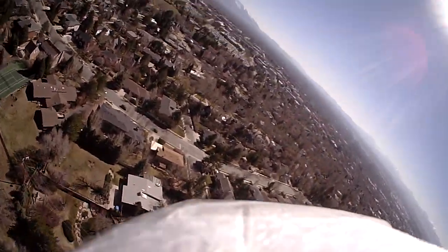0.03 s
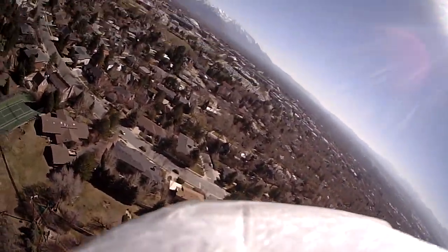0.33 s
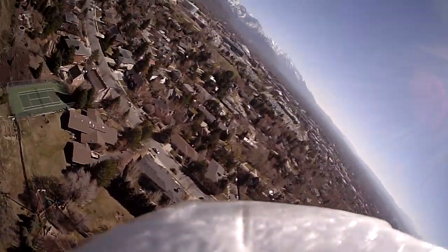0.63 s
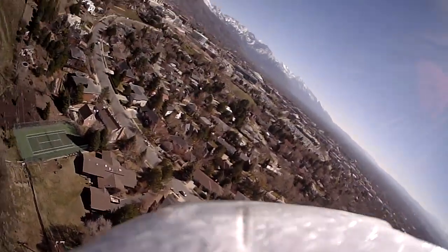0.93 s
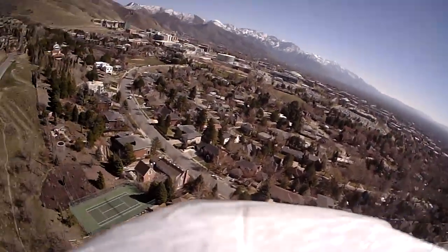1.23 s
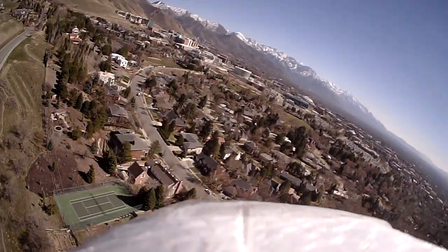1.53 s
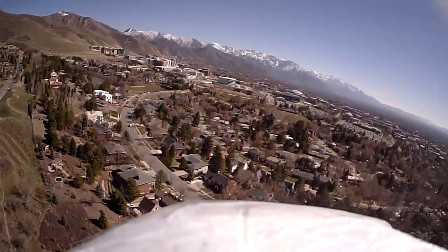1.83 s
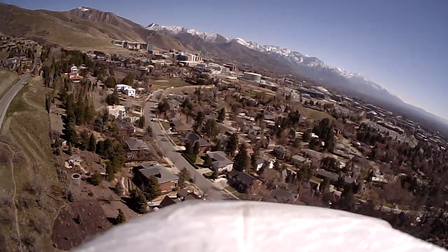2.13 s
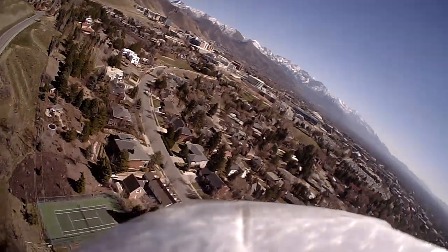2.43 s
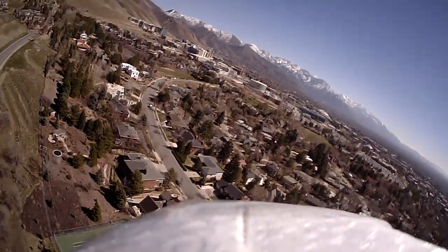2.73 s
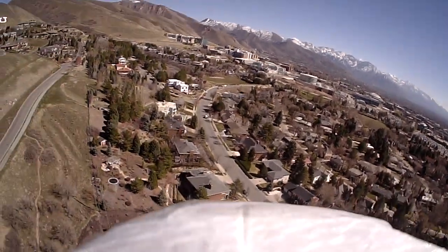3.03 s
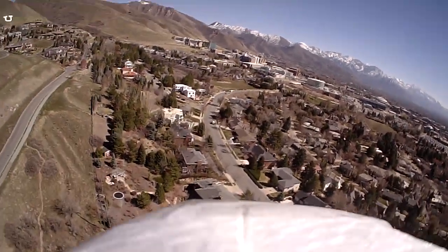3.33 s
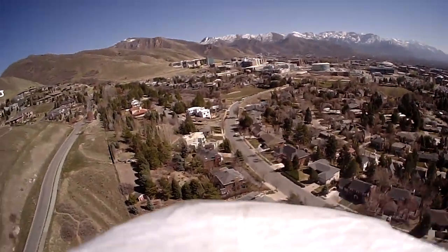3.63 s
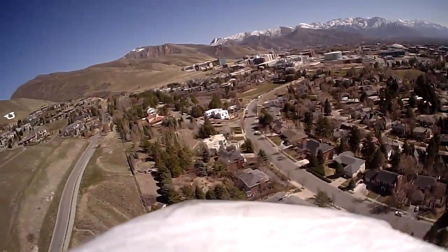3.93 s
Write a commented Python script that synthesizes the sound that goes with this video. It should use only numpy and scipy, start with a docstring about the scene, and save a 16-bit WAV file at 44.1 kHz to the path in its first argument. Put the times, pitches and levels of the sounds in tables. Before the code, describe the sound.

Strong wind buffets a microphone on a flying model aircraft, rumbling and thumping under a rushing hiss. The gusts swell early, ease briefly past the middle as faint dry ticks gather, then return.

```python
"""Air rushes over the camera microphone of a model aircraft as it banks and levels out.
It opens on lopsided buffeting, roar and fizz, with a breathy edge whistle and the housing's hollows.
At 0.5 s large eddies swell against the microphone port; by 2 s the whistle has faded. Near 2.6 s the
wind lulls, a band of hiss rises and the airframe's tiny dry ticks crowd together. From 2.8 s eddies
and hard buffets return while the hiss thins out."""
import sys
import numpy as np
from scipy import signal
from scipy.fft import rfft, irfft
from scipy.io import wavfile

SR = 44100
rng = np.random.default_rng(int(sys.argv[2]) if len(sys.argv) > 2 else 0)


def inscribe(sig):
    """Save sig as 16-bit PCM at rate SR to the path in sys.argv[1].

    A 1-D sig is mono; a 2-D sig holds one channel per row.
    Samples are clipped to [-1, 1] before scaling.
    """
    pcm = np.round(np.clip(np.atleast_2d(sig).T, -1, 1) * 32767)
    wavfile.write(sys.argv[1], SR, pcm.astype(np.int16))


N = 176400
T = np.arange(N) / SR
HZ = np.fft.rfftfreq(N, 1 / SR)


def amp(db):
    """dB to gain."""
    return 10 ** (np.asarray(db) / 20)


def unit(x):
    """Scale to rms 1."""
    return x / np.sqrt(np.mean(x ** 2) + 1e-20)


def curve(rows, column=1):
    """Time-table column, interpolated per sample."""
    rows = np.array(rows, float)
    return np.interp(T, rows[:, 0], rows[:, column])


def add(mix, start_s, sound):
    """Mix a sound in at start_s."""
    part = mix[max(round(start_s * SR), 0):][:len(sound)]
    part += sound[:len(part)]


def noise(spectrum):
    """Noise shaped by a spectrum table, rms 1."""
    hz, db = np.transpose(spectrum)
    gain = amp(np.interp(np.log(HZ + 1), np.log(hz), db))
    return unit(irfft(rfft(rng.standard_normal(N)) * gain, N))


def wander(rate_hz):
    """Smooth random motion up to rate_hz, rms 1."""
    re, im = rng.standard_normal((2, len(HZ)))
    gain = HZ / (HZ + 4) / np.sqrt(1 + (HZ / rate_hz) ** 4)
    return unit(irfft((re + 1j * im) * gain, N))


def blown(hz, width_hz):
    """Turbulence-driven resonance: a noise band around a pitch or pitch curve."""
    phase = 2 * np.pi * np.cumsum(hz * np.ones(N)) / SR
    return unit(wander(width_hz / 2) * np.cos(phase) + wander(width_hz / 2) * np.sin(phase))


# Large-eddy envelope: t/s, level/dB
EDDY_ENVELOPE = [(0,-31),(.15,-27),(.21,-32.5),(.37,-29.5),(.48,-20.5),(.85,-20),(.96,-22.5),(1.2,-20.5),(1.38,-20.5),(1.48,-24),(1.62,-18.5),(1.76,-29.5),(1.9,-24),(2.01,-28.5),(2.12,-24),(2.425,-23),(2.46,-29.5),(2.62,-35),(2.76,-31.5),(2.815,-24),(2.86,-31),(2.95,-27),(3.08,-28),(3.14,-37),(3.24,-25),(3.37,-22),(3.62,-23),(3.78,-26.5),(3.87,-23.5),(4,-34.5)]
# Rumble between eddies: f/Hz, level/dB
RUMBLE_SPECTRUM = [(15,-1),(30,-8),(60,0),(100,0),(150,7.5),(200,7),(280,0),(450,-8),(1000,-54)]
def eddies(rate_hz=150, mid_width_s=0.000913, mid_boom_hz=195.6, spread_db=3):
    """Unevenly shed eddies, each a push between two shallow pulls, over boom and rumble."""
    stretch = np.exp(0.075 * (T - T.mean()))  # bumps and boom slowly deepen
    gaps, sizes, lengths = rng.standard_normal((1100, 3)).T
    starts_s = np.cumsum(np.exp(0.5 * gaps)) / rate_hz
    bumps = np.zeros(N)
    for start_s, size, length in zip(starts_s[starts_s < T[-1]], sizes, lengths):
        width_s = mid_width_s * np.exp(0.18 * length) * stretch[int(start_s * SR)]
        u = np.arange(-6, 6, 1 / (width_s * SR))
        bump = (1 - u ** 2) * np.exp(-u ** 2 / 2)
        add(bumps, start_s, amp(spread_db * min(size, 1)) * bump)
    boom = blown(mid_boom_hz / stretch, width_hz=47)
    pressure = unit(1.46 * unit(bumps) + boom + noise(RUMBLE_SPECTRUM))
    return pressure * amp(curve(EDDY_ENVELOPE))


# Fine-buffeting envelope: t/s, relative level/dB
BUFFET_ENVELOPE = [(0,-21),(.15,-19),(.22,-22.5),(.36,-20.5),(.46,-18),(.72,-17),(.83,-18.5),(.98,-25),(1.25,-18.5),(1.48,-22),(1.62,-20),(1.75,-24),(2.17,-27.5),(2.24,-21),(2.42,-25),(2.47,-26.5),(2.63,-34),(2.76,-26.5),(2.84,-24),(3.07,-23.5),(3.16,-29),(3.27,-23.5),(3.52,-26.5),(3.87,-27),(4,-33)]
# Fine turbulence: f/Hz, level/dB
BUFFET_SPECTRUM = [(15,-17),(30,-25),(60,-14),(100,-5.5),(150,-4),(210,-4),(270,1),(340,-0.5),(450,0.5),(600,-6.5),(850,-13.5),(1400,-25.5),(3000,-54.5)]
def buffeting(skew=0.052, flutter_db=0.88, trim_db=-1.1):
    """Fine turbulence on the port; pushes are sharper than pulls."""
    churn = noise(BUFFET_SPECTRUM)
    lopsided = unit(churn + skew * (churn ** 2 - 1))
    return lopsided * amp(curve(BUFFET_ENVELOPE) + flutter_db * wander(62) + trim_db)


# Hard buffets: t/s, level/dB, f/Hz, rise/s
THUMP_EVENTS = [(.006,-16.5,180,0.0055),(.162,-14.5,198,0.0053),(.487,-11.5,185,0.0048),(.598,-17,242,0.0018),(.832,-14,230,0.0056),(1.588,-15,172,0.0038),
                (1.944,-16,203,0.0042),(2.122,-17,193,0.0049),(2.42,-12.5,215,.005),(2.819,-14.5,215,0.004),(2.897,-13,326,0.0013),(3.0,-19,328.6,.0012),
                (3.098,-11,205,0.0032),(3.18,-18.5,210,0.0046),(3.27,-17,190,0.0051),(3.686,-11.5,300,.0015)]
# Roughness within a buffet: f/Hz, level/dB
THUMP_SPECTRUM = [(40,-27),(120,4),(220,14),(400,-12),(700,-7.5),(1500,-25),(3000,-45),(6000,-70)]
def thumps(roughness=0.4):
    """Hard buffets kick the air in the port into a few dull, rough swings."""
    out = np.zeros(N)
    t = T[:4096]
    churn = noise(THUMP_SPECTRUM)
    for start_s, db, hz, rise_s in THUMP_EVENTS:
        swing = np.cos(2 * np.pi * hz * (t - rise_s))
        rough = roughness * churn[int(start_s * SR):][:len(t)]
        envelope = t / rise_s * np.exp(1 - t / rise_s)
        add(out, start_s, amp(db) * envelope * (swing + rough))
    return out


# Roar envelope: t/s, relative level/dB
RUSH_ENVELOPE = [(0,-28),(.05,-32.5),(.3,-31.5),(.47,-29.5),(.6,-29.5),(.67,-27),(.82,-30),(.98,-32.5),(1.12,-32.5),(1.27,-29),(1.46,-31),(1.6,-29.5),(1.7,-34),(2.05,-36.5),(2.19,-35),(2.25,-33.5),(2.4,-33),(2.45,-39),(2.6,-35.5),(2.88,-36.5),(3.21,-33),(3.27,-31.5),(3.38,-35),(3.75,-37),(3.89,-33),(4,-36.5)]
# Roar: f/Hz, level/dB
RUSH_SPECTRUM = [(100,1),(400,3),(700,3.5),(1000,1.5),(1450,1),(1800,-4.5),(2300,-13.5),(3200,-27),(6000,-43),(15000,-80)]
def rush(gust, flutter_db=1.3, trim_db=3.5):
    """Midrange roar of passing air, fluttering with the gusts."""
    return noise(RUSH_SPECTRUM) * amp(curve(RUSH_ENVELOPE) + flutter_db * gust + trim_db)


# Low-hiss and high-fizz envelopes: t/s, relative level/dB
HISS_ENVELOPE = [(0,-44),(.55,-44),(.75,-46.5),(1.05,-44.5),(1.46,-49.5),(1.7,-45.5),(1.9,-46.5),(2.1,-48),(2.33,-51.5),(2.45,-47.5),(2.8,-47),(3.15,-53),(3.65,-50),(3.88,-52.5),(4,-63)]
FIZZ_ENVELOPE = [(0,-40),(.1,-41),(.18,-44),(.21,-39.5),(.34,-36.5),(.41,-41),(.48,-40),(.54,-50),(.63,-46),(.74,-58.5),(.98,-48.5),(1.4,-63.5),(1.56,-62),(1.68,-53.5),(1.85,-56),(2,-61),(2.08,-58.5),(2.3,-72),(2.47,-55),(2.66,-53.5),(2.82,-57.5),(3.15,-72),(3.8,-69),(4,-80)]
# Low hiss and high fizz: f/Hz, level/dB
HISS_SPECTRUM = [(1000,-25),(2200,0.5),(3000,2.5),(3900,1.5),(4700,-5.5),(5400,-5),(6500,-4.5),(7250,-11),(10000,-33),(15000,-65)]
FIZZ_SPECTRUM = [(1500,-23),(3500,2.5),(6000,2.5),(7500,-1),(8600,1.5),(10000,2),(11450,0),(12000,4.5),(12600,1),(13750,3),(14400,-4),(15000,-14)]
# Hiss band in the lull: t/s, f/Hz, level/dB
SOUGH_TRACK = [(2.36,3100,-75),(2.46,3190,-50),(2.68,3550,-49),(2.85,3410,-54),(3.1,3400,-75)]
def hiss(gust, flutter_db=0.74, flicker_db=1.1):
    """Air skimming the housing: low hiss, restless fizz, a narrower sough in the lull."""
    low = noise(HISS_SPECTRUM) * amp(curve(HISS_ENVELOPE) + flutter_db * gust + 3)
    fizz = noise(FIZZ_SPECTRUM) * amp(curve(FIZZ_ENVELOPE) + flicker_db * wander(90) + 2)
    sough = blown(curve(SOUGH_TRACK), width_hz=1100) * amp(curve(SOUGH_TRACK, column=2))
    return low + fizz + sough


# Housing resonances: f/Hz, width/Hz, relative level/dB
LOW_MODES = [(4143,460,-48.5),(4513,520,-50.5)]
HIGH_MODES = [(5550,1100,-67),(6330,480,-61),(8800,710,-69),(13600,700,-77)]
# Airflow acting on the low modes: t/s, level/dB, bend/semitones
LOW_MODE_DRIVE = [(0,1.5,-0.42),(.3,-2,0.13),(.8,1,0.034),(1.25,1.5,0.19),(1.55,1.5,0.058),(2,-4,-0.39),(2.12,0,0.18),(2.34,2,0.31),(2.5,-2,-1.6),(2.66,0,-1.85),(2.88,-2.5,-.8),(3.08,1,0.2),(3.28,0,-0.27),(3.55,-2.5,0.0064),(3.9,-1.5,-0.19),(4,-3,-0.25)]
def hollows(gust, flutter_db=0.5):
    """Passing air sounds the housing's hollows and bends the low ones in pitch."""
    bend = 2 ** (curve(LOW_MODE_DRIVE, column=2) / 12)
    low = sum(amp(db) * blown(hz * bend, width_hz) for hz, width_hz, db in LOW_MODES)
    high = sum(amp(db) * blown(hz, width_hz) for hz, width_hz, db in HIGH_MODES)
    return (low * amp(curve(LOW_MODE_DRIVE)) + high) * amp(flutter_db * (gust + wander(12)))


# Edge tone: t/s, f/Hz, level/dB
WHISTLE_TRACK = [(0,8800,-62),(.16,8700,-48),(.36,8600,-66),(.47,9100,-44),(.55,9150,-50),(.74,8990,-55),(.86,8500,-49.5),(1,8120,-48),(1.2,8570,-52),(1.42,8800,-57),(1.62,8440,-55.5),(1.73,7700,-55),(2,8200,-72)]
# Edge-tone partials: f ratio, width/Hz, relative level/dB
WHISTLE_PARTIALS = [(0.744,650,-5.5),(1,700,-0.5),(1.25,800,-17)]
def whistle(flutter_db=2.5):
    """Breathy edge tone with weaker side partials; pitch drifts with the airflow."""
    hz = curve(WHISTLE_TRACK)
    tone = sum(amp(db) * blown(ratio * hz, width_hz) for ratio, width_hz, db in WHISTLE_PARTIALS)
    return tone * amp(curve(WHISTLE_TRACK, column=2) + flutter_db * wander(40))


def snap(hz, decay_s, rise_s=0.00004, highpass_hz=6000):
    """Thin snap ringing for a cycle or two, peak 1."""
    t = T[:256]
    envelope = (1 - np.exp(-t / rise_s)) * np.exp(-t / decay_s)
    highpass = signal.butter(4, highpass_hz, "high", fs=SR, output="sos")
    ring = signal.sosfilt(highpass, envelope * np.sin(2 * np.pi * hz * t))
    return ring / abs(ring).max()


# Airframe ticks: t/s, relative level/dB, f/Hz, decay/s
TICK_EVENTS = [(.2018,-22,12000,.00015),(.2072,-27,11000,.00015),(.216,-25,8000,.0001),
               (0.605,-23.5,8510,.00015),(0.6352,-25,9050,.00015),(.6704,-33,9250,.0001),(.8006,-33,8830,.0002),(.846,-27,8540,.0001),
               (.9073,-28,8230,.0001),(.9448,-31,8390,.0001),(.9592,-26,8420,.0001),(1.2042,-32,8760,.0001),(1.2453,-34,8720,0.000087),
               (1.3174,-32,8700,.00015),(1.6188,-34,8680,.0001),(1.8803,-33,8270,.0001),(1.946,-34,8320,.0001),(2.0662,-40,10000,.0001),(2.1926,-33,8730,.00006),
               (2.2319,-41,7500,.0002),(2.3321,-38,7900,0.00022),(2.403,-31,8000,0.00011),(2.4224,-32,7600,.0002),(2.5247,-34,10000,.0002),(2.5282,-31,7500,.0001),
               (2.531,-34,10500,.0003),(2.54,-37,12900,.0003),(2.5528,-31,10100,.0002),(2.5852,-33,9830,0.00023),(2.6095,-27.5,9580,0.0002),(2.62,-36,10200,.00025),
               (2.6512,-25,9600,0.000072),(2.662,-26.5,10800,0.00015),(2.724,-36,10250,.00025),(2.7283,-35,9540,0.00014),(2.7551,-30,12800,.0002),(2.76,-27,8260,.00012),
               (2.7976,-34,7500,.0001),(2.839,-38,9500,.0001),(2.9774,-35,8520,.0001),(3.02,-39,10900,.0001),
               (3.1308,-40,7800,.00015),(3.5957,-40,8510,.0001),(3.6855,-42,8760,0.00011),(3.7115,-43,9820,.0001),(3.7339,-34,9150,.0001),
               (3.791,-38,7900,.00015),(3.823,-38,9970,0.00011)]
def ticks(delay_s=0.0011, trim_db=4):
    """Single dry ticks of the airframe."""
    out = np.zeros(N)
    for start_s, db, hz, decay_s in TICK_EVENTS:
        add(out, start_s + delay_s, amp(db + trim_db) * snap(hz, decay_s))
    return out


# Crackle envelope: t/s, level/dB re FIZZ_ENVELOPE
CRACKLE_ENVELOPE = [(0,-4),(.5,-0.5),(1.9,-3),(2.45,-3),(2.53,0),(2.68,1.5),(2.85,-6),(4,-7)]
def crackle(rate_hz=420, spread_db=4.5):
    """Fine random crackle that grows with the fizz."""
    out = np.zeros(N)
    snaps = [snap(hz, decay_s=0.00018) for hz in np.geomspace(8500, 12500, 8)]
    levels_db = spread_db * np.minimum(rng.exponential(1, N), 3.5)
    picks = rng.integers(0, len(snaps), N)
    for i in np.flatnonzero(rng.random(N) < rate_hz / SR):
        add(out, i / SR, amp(levels_db[i]) * snaps[picks[i]])
    return unit(out) * amp(curve(FIZZ_ENVELOPE) + curve(CRACKLE_ENVELOPE))


def scene():
    """Mono sum at the microphone; roar, low hiss and hollows share one gust signal."""
    gust = wander(100)
    wind = eddies() + buffeting() + thumps() + rush(gust)
    return (wind + hiss(gust) + hollows(gust) + whistle() + ticks() + crackle())[None]


def record(dry, ceiling=0.8, cutoff_hz=14550):
    """The microphone soft-clips the hardest pushes; the camera limits the band."""
    rounded = ceiling * np.tanh(dry / ceiling)
    lowpass = signal.firwin(171, cutoff_hz, window=("kaiser", 8), fs=SR)
    return signal.oaconvolve(rounded, lowpass[None], "same")


dry = scene()
out = record(dry)
inscribe(out)
```